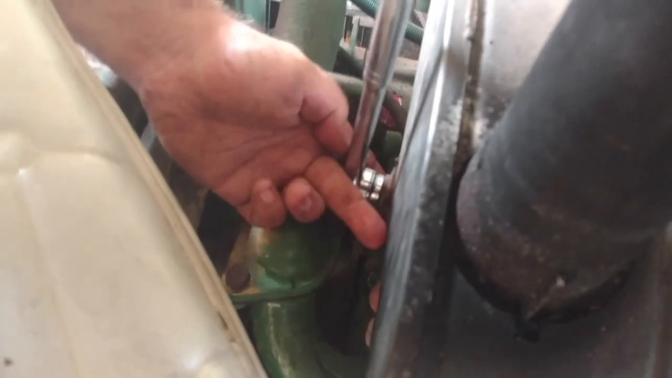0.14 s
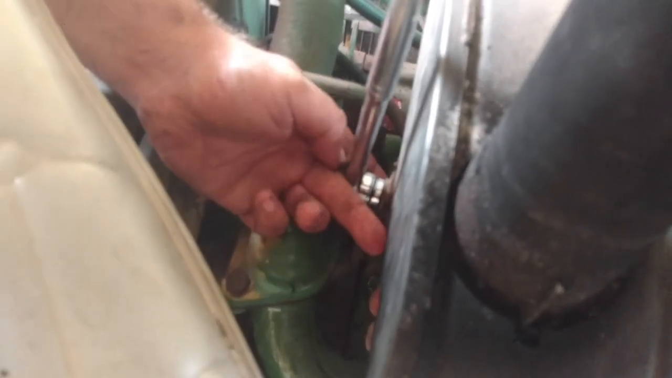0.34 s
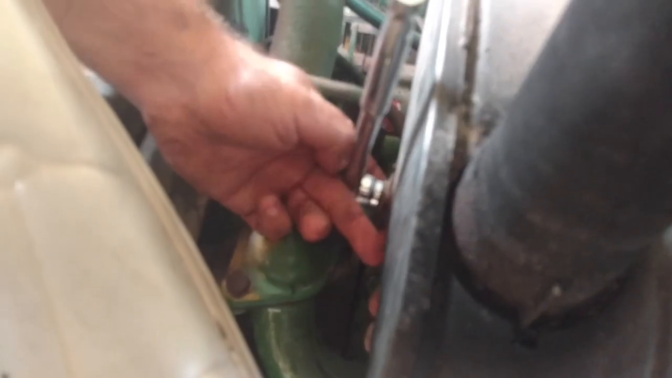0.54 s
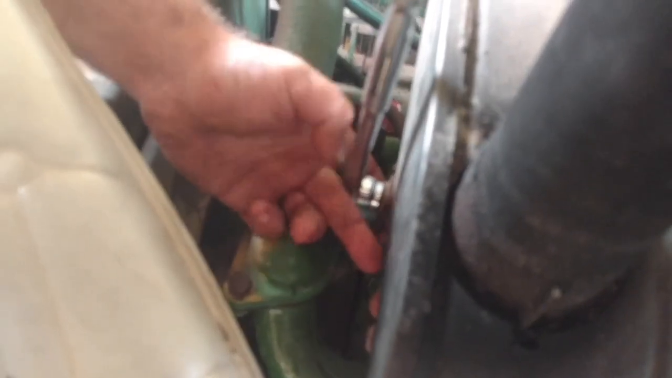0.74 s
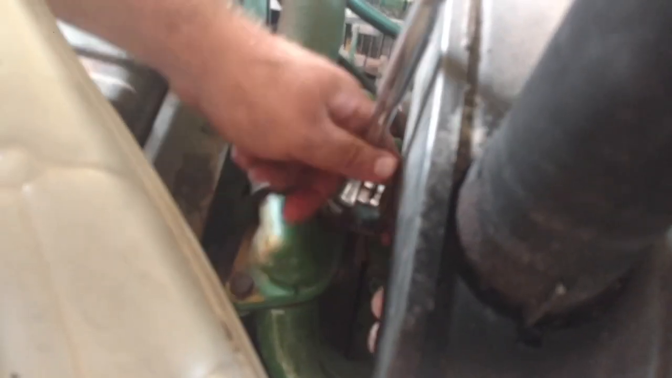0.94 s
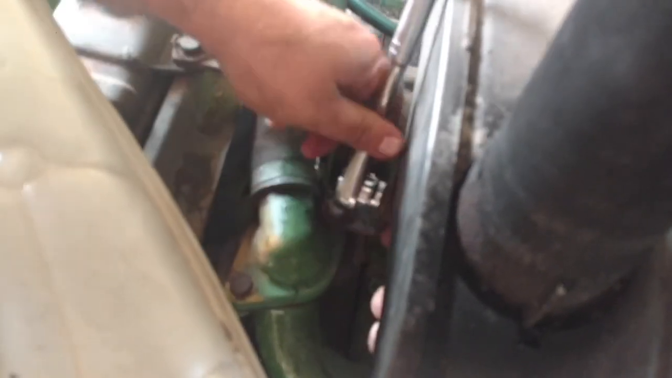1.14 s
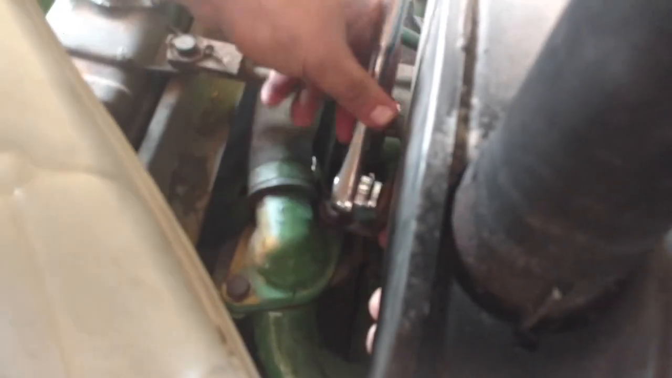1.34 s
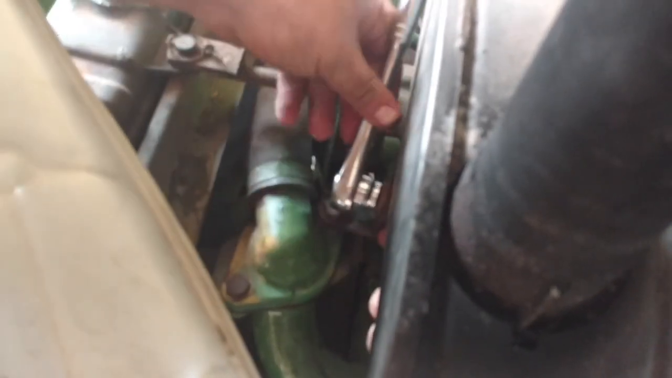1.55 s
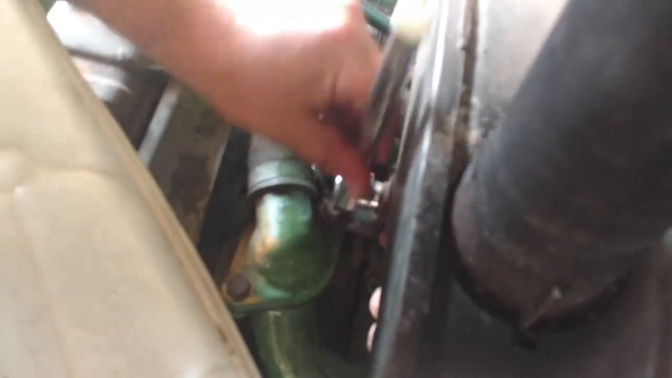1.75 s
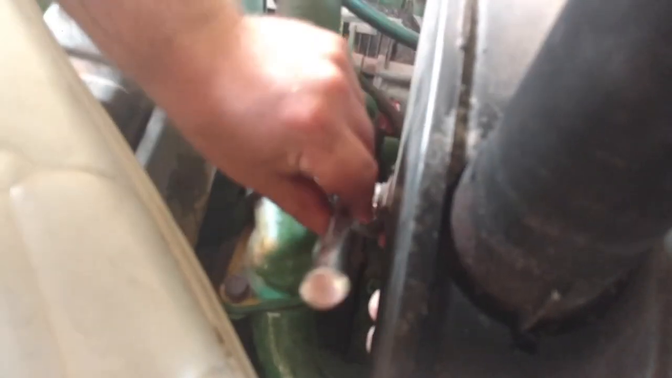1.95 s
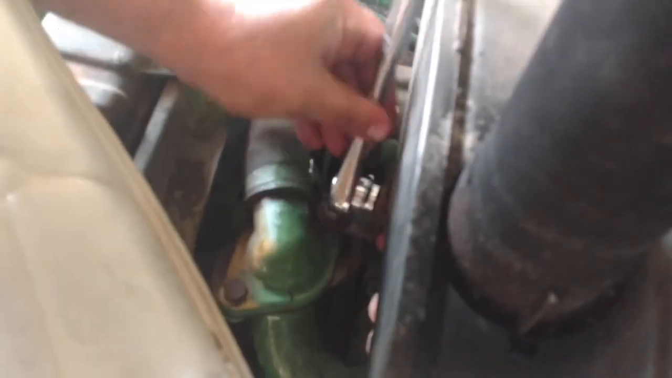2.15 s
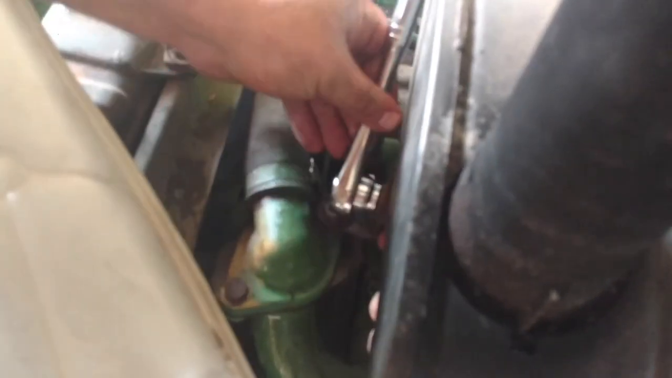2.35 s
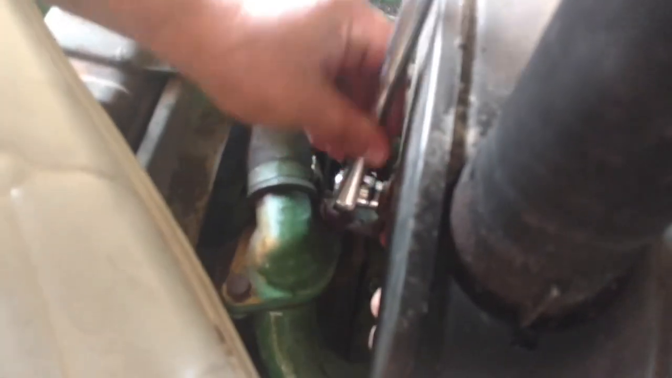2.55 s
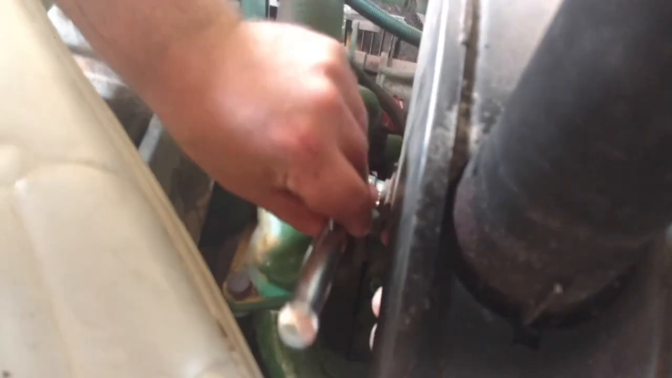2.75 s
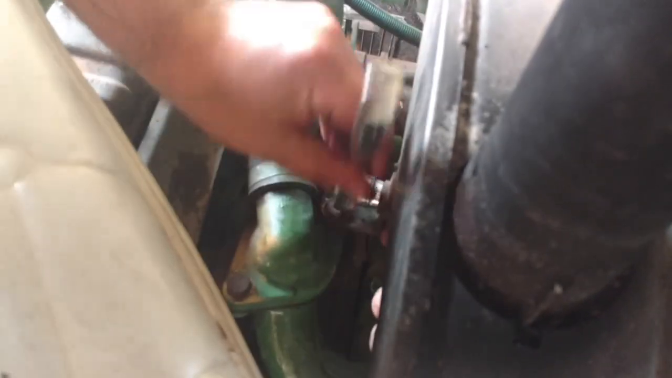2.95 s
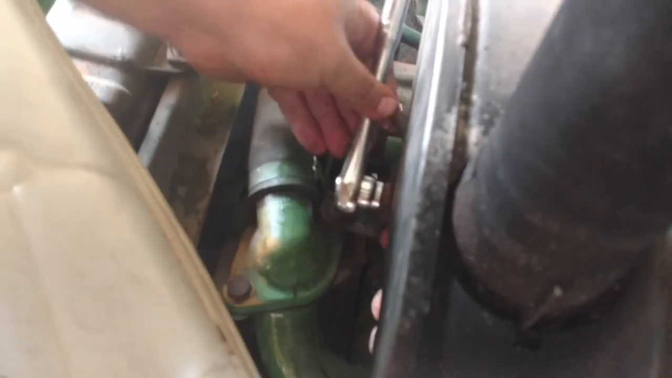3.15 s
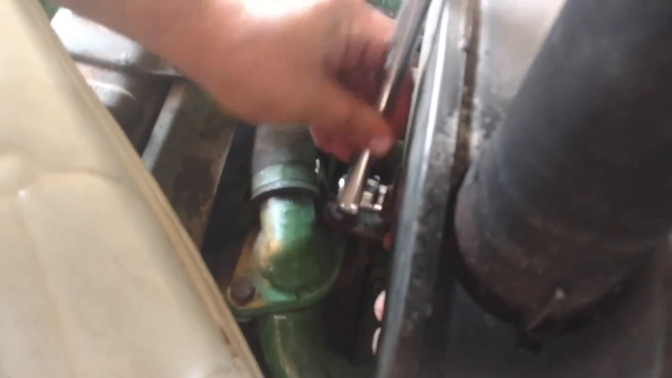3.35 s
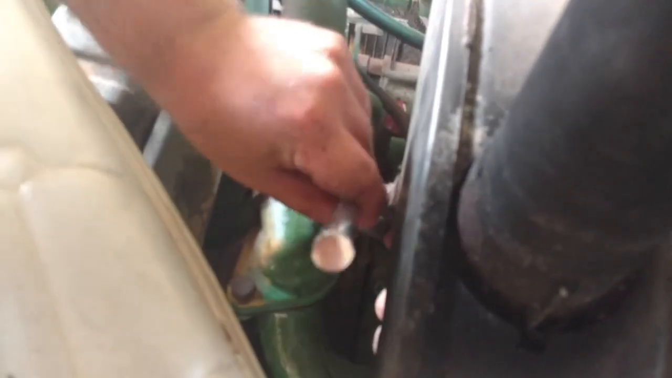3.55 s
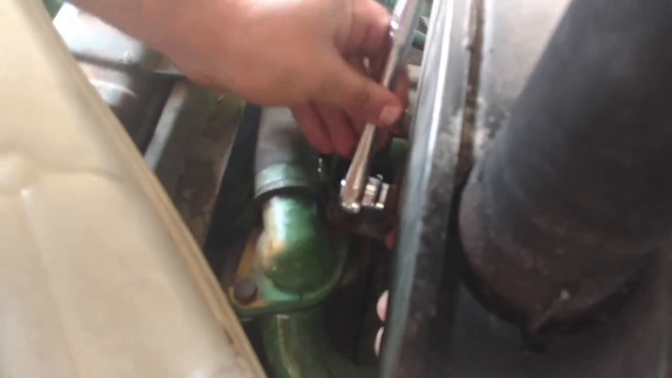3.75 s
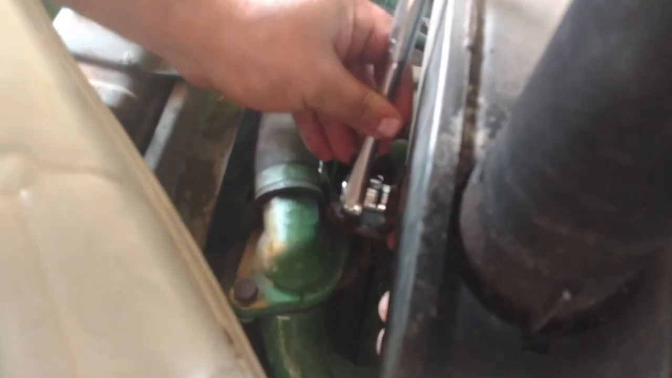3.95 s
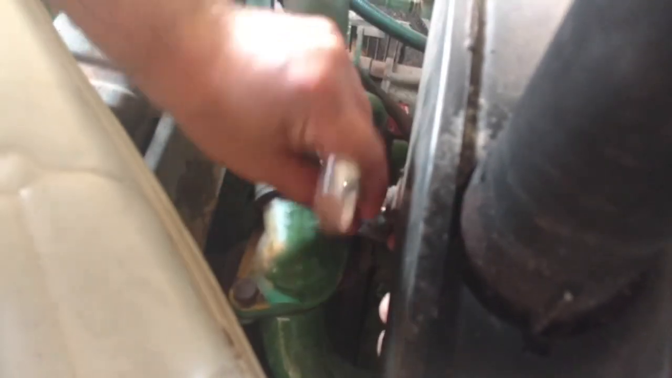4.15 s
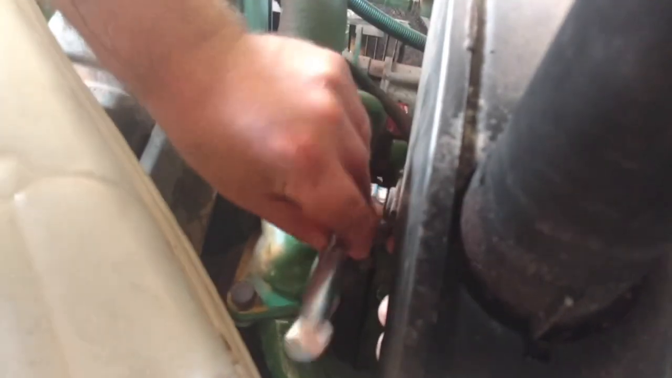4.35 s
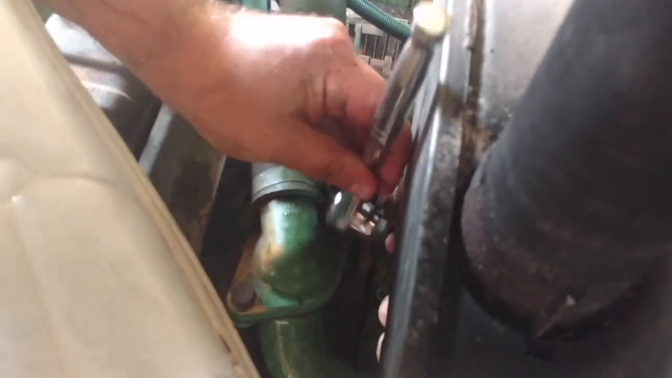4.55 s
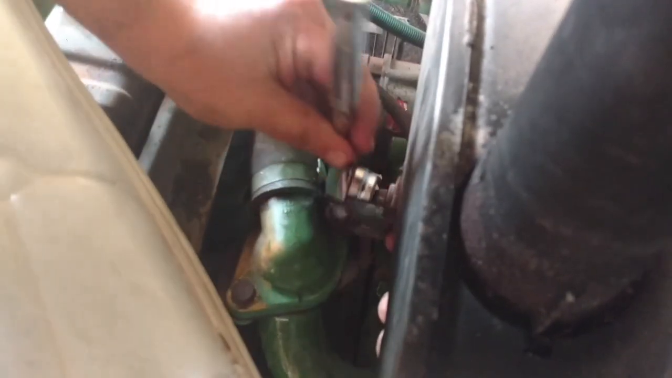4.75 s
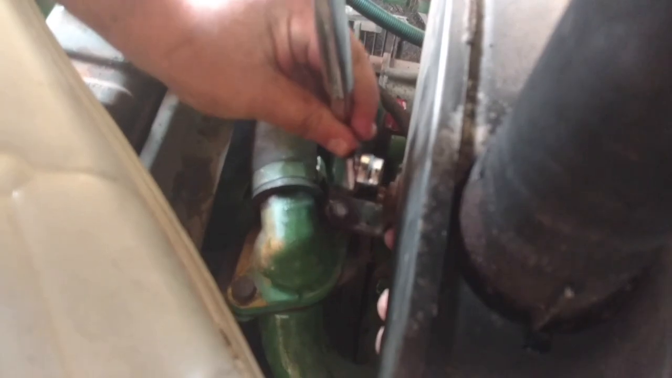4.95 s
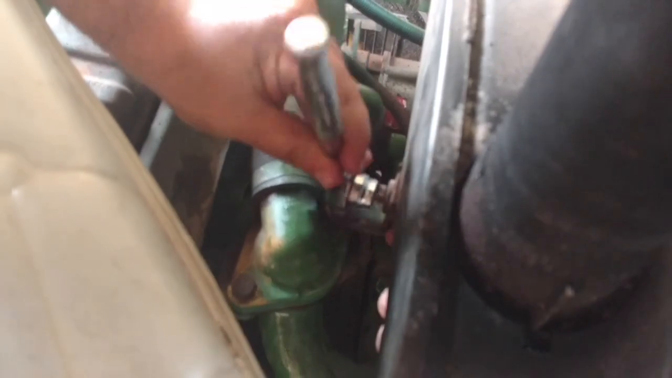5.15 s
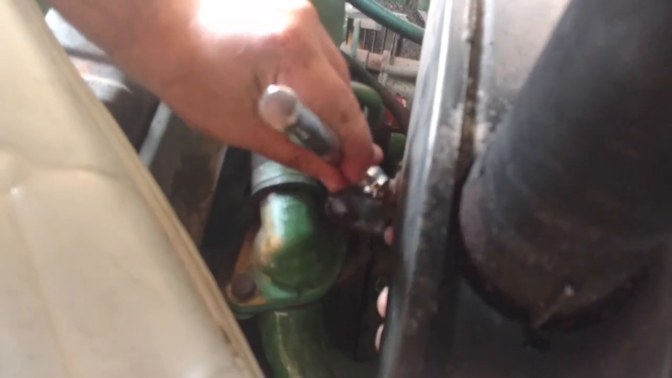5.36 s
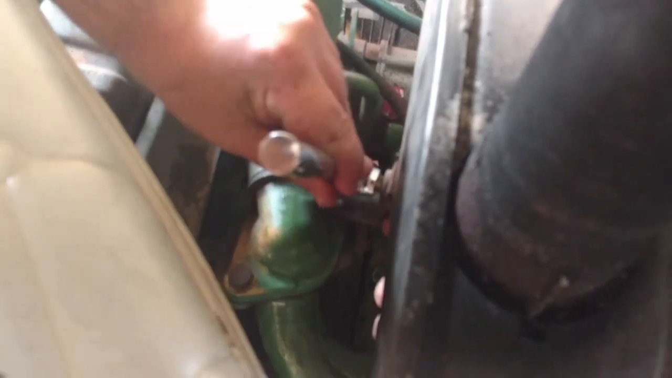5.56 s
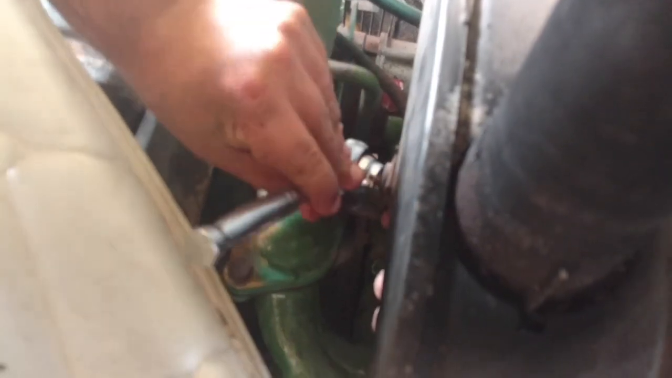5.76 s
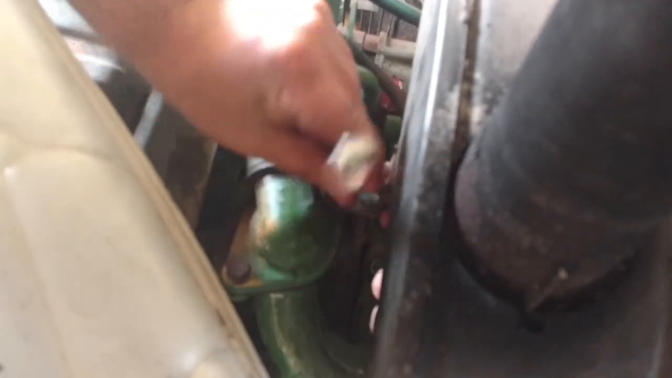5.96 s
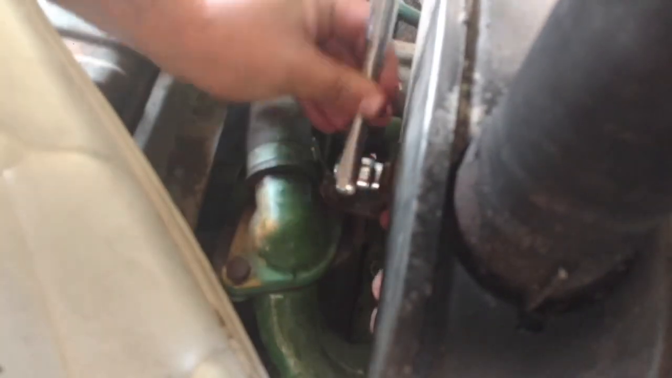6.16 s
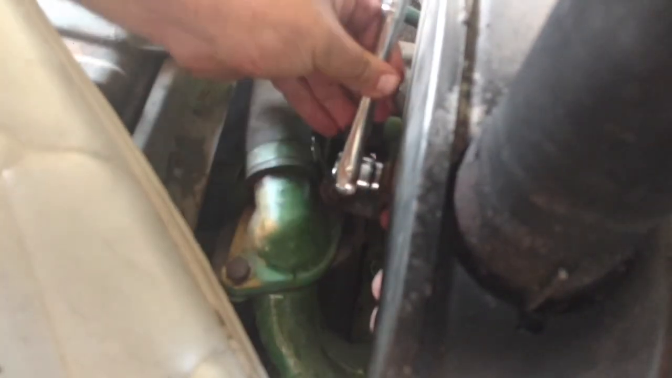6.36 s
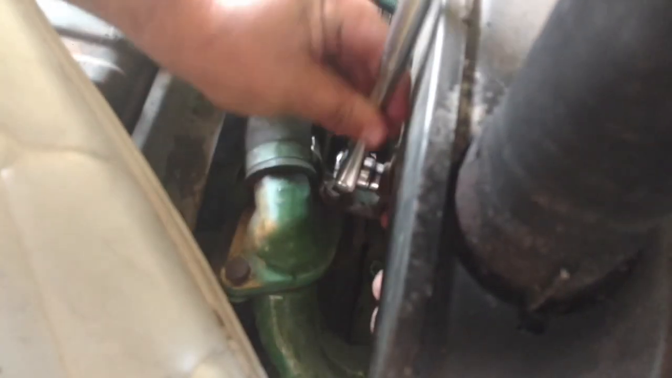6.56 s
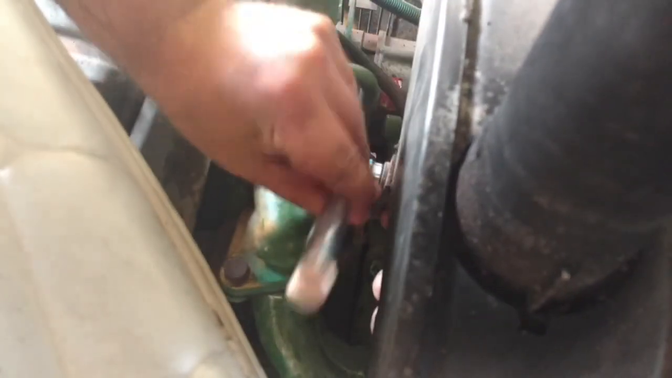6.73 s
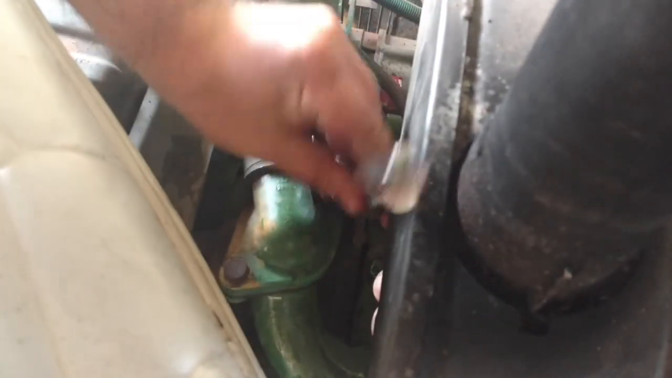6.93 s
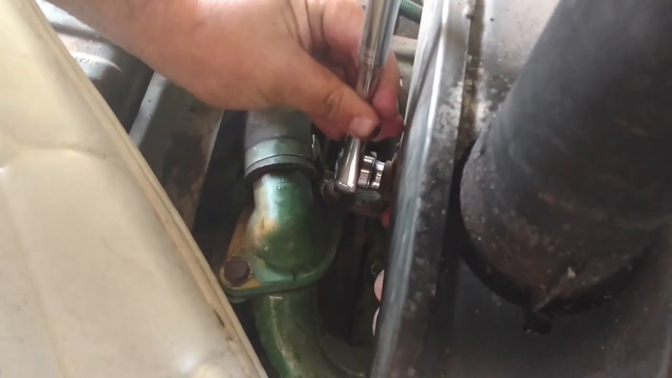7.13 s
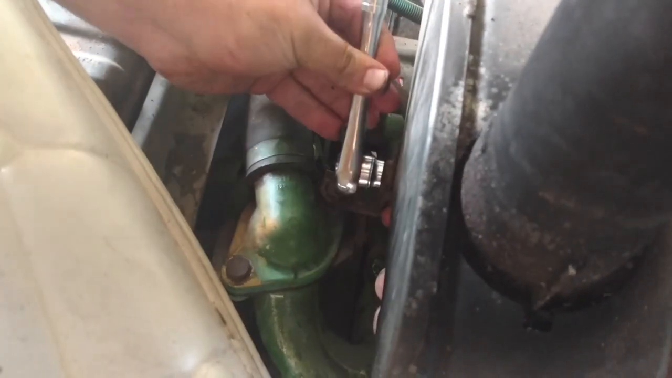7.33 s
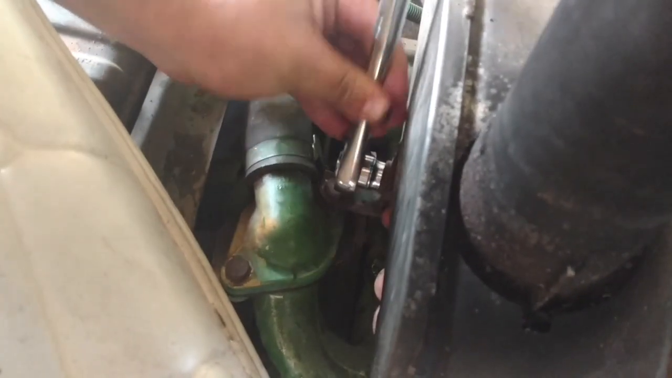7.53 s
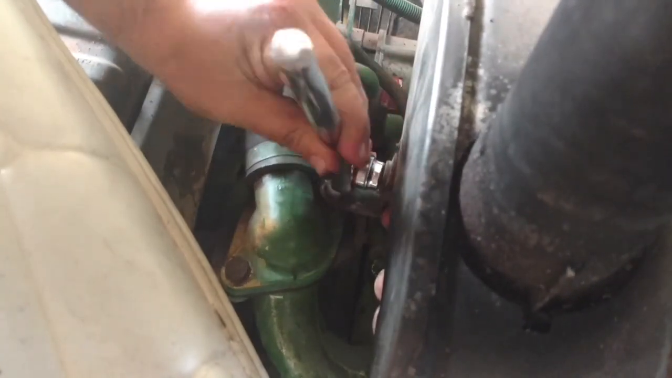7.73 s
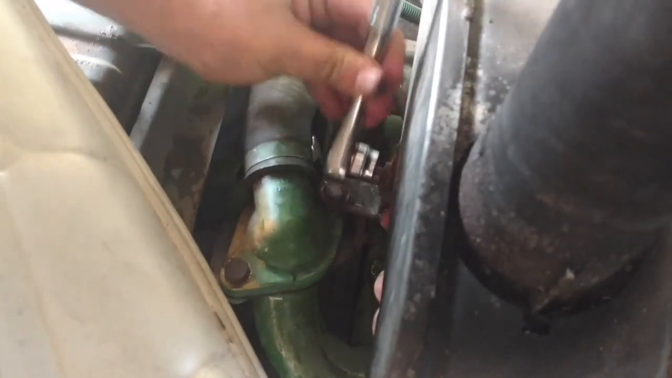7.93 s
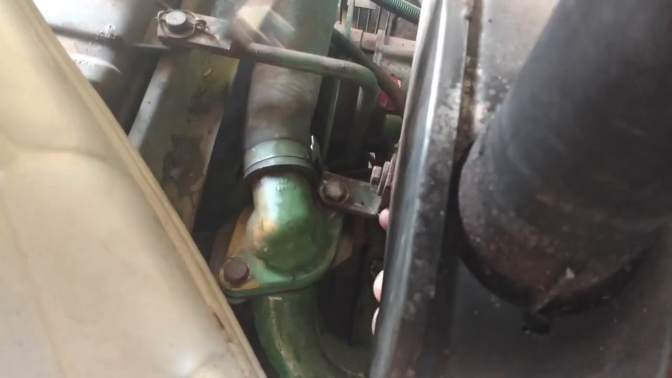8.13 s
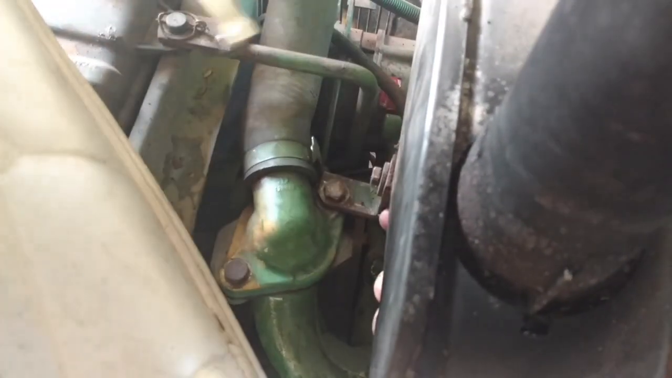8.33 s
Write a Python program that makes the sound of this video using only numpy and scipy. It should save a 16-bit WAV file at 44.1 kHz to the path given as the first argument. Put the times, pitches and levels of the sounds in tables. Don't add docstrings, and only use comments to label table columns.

```python
import sys
import numpy as np
from scipy import signal
from scipy.fft import rfft, irfft, next_fast_len
from scipy.io import wavfile
from scipy.ndimage import uniform_filter1d

SR = 44100
rng = np.random.default_rng(int(sys.argv[2]) if len(sys.argv) > 2 else 0)


def ratio_of_db(decibels):
    return 10 ** (np.asarray(decibels, float) / 20)


def bounce(signal):
    frames = np.transpose(np.atleast_2d(signal))
    limited = np.clip(frames, -1, 1)
    pcm = np.round(limited * 32767).astype(np.int16)
    wavfile.write(sys.argv[1], SR, pcm)


N = 369999


def noise(channels):
    return rng.standard_normal((channels, N))


def band(x, low_hz, high_hz):
    return signal.sosfilt(signal.butter(2, [low_hz, high_hz], "band", fs=SR, output="sos"), x)


def coloured(spectrum, channels):
    hz, db = np.transpose(spectrum)
    size = next_fast_len(N)
    grid_hz = np.maximum(np.arange(size // 2 + 1) * SR / size, 1)
    gain = ratio_of_db(np.interp(np.log(grid_hz), np.log(hz), db))
    return irfft(rfft(noise(channels), size) * gain, size)[:, :N]


def train(times_s, db):
    out = np.full(N, 1e-18)
    np.add.at(out, np.round(np.asarray(times_s) * SR).astype(int), ratio_of_db(db))
    return out


def dying(clicks, t60_s):
    return signal.lfilter([1], [1, -ratio_of_db(-60 / (t60_s * SR))], clicks)


def swelling(clicks, t60_s):
    return dying(dying(clicks, t60_s), t60_s) * np.e * np.log(1000) / (t60_s * SR)


def ring(drive, hz, t60_s):
    r, w = ratio_of_db(-60 / (t60_s * SR)), 2 * np.pi * hz / SR
    return signal.lfilter([0, np.sin(w)], [1, -2 * r * np.cos(w), r * r], drive)


def place(x, lag_samples, pan_db):
    size = next_fast_len(N)
    delay = np.exp(-2j * np.pi * np.arange(size // 2 + 1) / size * lag_samples)
    late = irfft(rfft(x, size) * delay, size)[:N]
    return np.array([late * ratio_of_db(pan_db / 2), x * ratio_of_db(-pan_db / 2)])


# start in seconds, peak in dB, snap in dB rel peak, jolt through the mount in dB.
DROPS = [(0.0, -38.5, -17, -83), (1.4244, -12.5, -46, -37.5), (2.129, -20, -2, -62), (2.139, -16, -8, -47),
         (4.567, -18.5, -5.5, -71), (4.9759, -29.5, -6, -63), (5.3505, -11.5, -7, -66),
         (6.0062, -31.5, 2, -50), (6.009, -10.5, -8, -40.5), (6.0248, -20.5, -23, -65),
         (6.2294, -20.5, -21.5, -65), (6.3753, -13.5, -23, -44), (6.9586, -17, -8, -53),
         (7.8714, -31.5, 0.5, -60)]
# start in seconds, peak in dB, snap in dB rel peak, jolt in dB.
SWING_TEETH = [(2.9958, -16, -6.5, -53), (3.0132, -16, -12, -57), (3.027, -21, -8, -50),
               (3.04, -15.5, -11, -47), (3.051, -18.5, -16, -46), (3.0640, -17.5, -12, -51),
               (3.0763, -17, -18, -44), (3.0884, -15.5, -19, -44), (3.1046, -21.5, -32, -47),
               (3.1074, -22, -21, -57), (3.689, -17, -17, -44), (3.701, -16, -12, -54),
               (3.7123, -16.5, -24, -50), (6.1100, -17, -16, -48), (6.13, -16, -10, -42),
               (6.1464, -14, -14, -44), (6.1582, -18, -21, -54)]
# start in seconds, peak in dB, snap in dB rel peak.
SHIVERS = [(1.0134, -46, 27), (3.853, -42, 4), (4.477, -40, -19), (4.523, -37.5, -9), (4.734, -58.5, 6),
           (5.448, -40.5, -9), (5.929, -50.5, 17.5), (7.5282, -37, -16), (7.542, -45.5, 2.5),
           (2.546, -48, 2)]


def ticks():
    shiver_jolt_db = -65.5
    return np.transpose([*DROPS, *SWING_TEETH] + [(*row, shiver_jolt_db) for row in SHIVERS])


# frequency in Hz, level in dB, t60 in seconds.
HEAD = [(6600, -14, .008), (8479, -14, .008), (9500, -7, .006), (10230, -4, .007), (10800, -3, .005),
        (11220, 0, .01), (11460, -19, .05), (11690, 0, .009), (12200, -20, .04), (12740, -6, .007),
        (13690, -10, .005), (15200, -19, .004)]


def ring_head(s, db_per_mode):
    chatter = dying(train(s, db_per_mode.mean(axis=1) - 12), 0.04)
    grit = noise(channels=3)
    out = 0
    for k, (hz, db, t60_s) in enumerate(HEAD):
        push = dying(train(s, db_per_mode[:, k] + 8), 0.003)
        out = out + ring((push + chatter) * ratio_of_db(db) * grit[k % 3], hz, t60_s)
    return out


def pawl():
    s, db, snap_db, jolt_db = ticks()
    share_db = db[:, None] - 30.5 + 2.2 * rng.standard_normal((len(s), len(HEAD)))
    head = np.array([ring_head(s, share_db + 3), ring_head(s, share_db)])
    edge = band(train(s + 0.0022, db - 2.5) * [[1], [-0.6]], 2500, 16000)
    snap = band(swelling(train(s, db + snap_db + 0.5), 0.0057) * noise(channels=2), 2800, 6900)
    tail = dying(train(s, db - 23), 0.11) * noise(channels=2)
    tail = band(band(tail, 9800, 12600), 9000, 13000)
    bay = band(dying(train(s, db + snap_db - 19), 0.09) * noise(channels=2), 2500, 7500)
    jolt = band(ring(train(s, jolt_db + 18), 260, 0.0066), 70, 900)
    return head + edge + snap + tail + bay + jolt * [[1], [-0.15]]


# start in seconds, peak in dB, crack in dB rel peak, ring centre in Hz.
LOOSE_BLOWS = [(1.0129, -8, -21.5, 1600), (1.0572, -15.5, -20, 1800), (1.503, -27.5, -16.5, 1260),
               (2.071, -19, -20, 1770), (2.299, -28.5, -23, 1170), (3.267, -25.5, -19.5, 1220),
               (3.689, -34.5, -10, 1330), (3.865, -21.5, -20.5, 1270), (3.886, -37, -15, 1210),
               (4.49, -30.5, -22, 573), (4.566, -15.5, -15, 1270), (4.974, -25.5, -10.5, 880),
               (5.349, -16, -12, 977), (5.364, -32.5, -4.5, 990), (5.474, -37, -9, 900),
               (5.666, -29, -14.5, 595), (5.697, -47.5, -3, 800), (4.73, -63, 4, 1100)]
# start in seconds, peak in dB, crack in dB rel peak, centre in Hz.
FIRM_BLOWS = [(1.0178, -16.5, -32, 1390), (1.061, -19, -31, 1630), (1.036, -27, -38, 1300),
              (1.085, -23, -44, 1710), (1.0901, -25.5, -45, 1400), (1.112, -35, -31.5, 1200),
              (1.424, -33, -15, 480), (2.037, -42.5, -11.5, 1080), (2.0907, -22, -39, 1050),
              (2.138, -38.5, -6, 1130), (2.317, -30.5, -25, 1127), (2.714, -51, -33, 1110),
              (3.039, -36.5, -5.5, 786), (3.051, -35, -9, 465), (3.073, -33.5, -23, 456),
              (3.087, -37, -32, 1000), (3.248, -35.5, -14, 715), (3.286, -30.5, -24, 1150),
              (3.461, -41.5, -31.5, 730), (3.71, -32, -9, 1120), (4.424, -40, -25, 780),
              (4.558, -30, -14, 1470), (4.734, -44, -26, 575), (5.19, -31.5, -10, 760),
              (5.292, -39, -33, 800), (5.3008, -31, -23, 900), (5.3207, -25, -19, 1000),
              (5.3223, -26.5, -26, 800), (5.4499, -29, -7, 1100), (5.4545, -22, -17, 895),
              (5.517, -25, -43, 830), (5.906, -30, -10.5, 920), (5.991, -31.5, -9.5, 1090),
              (6.007, -31, -8, 1280), (6.025, -34, -21, 800), (6.11, -33.5, -13.5, 905),
              (6.32, -48.5, -11, 1100), (7.9335, -31, -12, 800), (7.939, -21, -17, 1090),
              (4.441, -35.5, -15.5, 800), (4.46, -40.5, -18, 900), (4.523, -42, -22, 1150),
              (4.571, -26.5, -26, 1300), (4.579, -21.5, -42, 1100), (4.5911, -36, -32, 1150),
              (5.605, -47, -28, 790), (5.7255, -37.5, -20, 800), (5.823, -51, -23, 2000),
              (5.894, -36, -21, 800)]
# start in seconds, peak in dB, ring centre in Hz, slide in dB rel peak.
SLIPS = [(1.53, -43.5, 916, -8), (1.643, -41.5, 577, -10), (2.007, -46.5, 923, 3.5),
         (2.916, -43.5, 1110, 1), (3.62, -47, 1130, 0.5), (4.435, -35.5, 800, 0), (4.508, -31, 934, -2.5),
         (4.699, -43.5, 1420, 8), (5.004, -31.5, 776, -2), (5.099, -35, 597, -3), (5.166, -35.5, 716, 3.5),
         (5.626, -39.5, 740, 5), (5.643, -27, 805, -3), (5.889, -35, 734, 13.5), (6.149, -34.5, 1190, -8),
         (6.89, -57.5, 764, 14), (7.259, -48.5, 468, -21), (7.456, -43.5, 533, -1.5), (7.818, -41, 436, 7),
         (7.874, -33, 1590, 0.5)]
# start in seconds, peak in dB, crack in dB rel peak.
SOCKET_TAPS = [(.902, -45.5, 3), (2.228, -53, -16), (2.613, -42, -22.5), (2.86, -52, -32.5),
               (2.995, -37.5, -7), (3.231, -45.5, -15), (3.674, -43, -34), (4.073, -37, -14.5),
               (4.13, -38, -19), (4.391, -46.5, -20), (4.407, -42, -9.5), (5.709, -35, -34.5),
               (5.749, -55, -23), (5.844, -47.5, -31), (6.132, -37.5, -5), (6.445, -51.5, -9.5),
               (6.485, -47.5, -21), (6.591, -47, -18.5), (7.025, -48, -18), (7.103, -47.5, -17),
               (7.44, -56, -13), (6.935, -44.5, -17.5), (7.48, -49.5, -9), (7.527, -39.5, -8.5),
               (7.635, -49, -24)]
HANDLE_TAPS = [(.987, -51, -4), (2.698, -51, -14), (2.884, -39, -20.5), (3.197, -41.5, -15.5),
               (3.853, -39, -15), (4.05, -46.5, -10.5), (4.477, -38, -9.5), (5.232, -41, -30),
               (6.231, -42.5, -5), (6.96, -33.5, -9)]
CASING_TAPS = [(.447, -46.5, -21), (2.539, -36.5, -12), (2.952, -50, -5.5), (3.547, -40, -22.5),
               (6.375, -44, -0.5), (7.513, -44, -17)]
# start in seconds, peak in dB.
GRIT = [(1.6272, -51.5), (2.103, -51), (3.6724, -54), (4.523, -40.5), (4.7298, -53.5), (5.5298, -46),
        (5.58, -66), (5.722, -59), (5.748, -52), (5.7981, -63), (5.8211, -52), (5.8872, -42), (5.9, -33),
        (5.9297, -39), (5.946, -46), (5.9782, -52), (7.4669, -57.5), (8.153, -50)]


def knocks():
    firm_rattle_db, tap_rattle_db = -33.5, -10
    rows = [(*row, -7 - 0.18 * (row[1] + 21)) for row in LOOSE_BLOWS]
    rows += [(*row, firm_rattle_db) for row in FIRM_BLOWS]
    rows += [(s, db, -14.5 - 0.21 * (db + 44.5), hz, slide_db) for s, db, hz, slide_db in SLIPS]
    for taps, centre_hz in ((SOCKET_TAPS, 770), (HANDLE_TAPS, 1130), (CASING_TAPS, 460)):
        rows += [(*row, centre_hz, tap_rattle_db) for row in taps]
    rows += [(s, db - 14, 6.5, 1500, firm_rattle_db) for s, db in GRIT]
    return np.transpose(rows)


def ring_iron(modes, s, db_per_mode, extra):
    at, out = np.round(s * SR).astype(int), 0
    throw = rng.choice([-1, 1], db_per_mode.shape) * ratio_of_db(db_per_mode)
    for k, (hz, db, t60_s) in enumerate(modes):
        drive = (-1) ** k * extra + 1e-18
        np.add.at(drive, at, throw[:, k])
        out = out + ring(ratio_of_db(db) * drive, hz, t60_s)
    return out


# centre in Hz, level in dB.
THUDS = [(520, -5), (800, -6.5), (1200, -11), (1750, -8), (2250, -8.5)]


def casting(s, db, centre_hz):
    out = 0
    for hz, thud_db in THUDS:
        level_db = db + thud_db - 7 * np.log2(hz / centre_hz) ** 2
        hits = train(s, level_db)
        shape = ratio_of_db(-6.5) * (swelling(hits, 0.014) + dying(hits, 0.091))
        strike = ring(train(s + 0.001, level_db + 2 + 0.9 * db), hz, 0.037)
        thud = shape * noise(channels=3) + strike * [[1], [0], [0]]
        shared, *own = band(band(thud, hz / 1.25, hz * 1.22), hz / 1.14, hz * 2)
        out = out + ratio_of_db(2) * place(shared, 5.1, -0.3) + ratio_of_db(6) * np.array(own)
    return out


# start in seconds, level in dB, t60 of the shaking in seconds.
BOOMS = [(1.013, -43, 0.36), (1.085, -47, 0.11), (1.62, -59, 0.31), (2.08, -60, .1), (3.27, -53, 0.29),
         (3.865, -51.5, 0.32), (4.1, -62.5, .4), (4.448, -50, 0.34), (4.566, -49, 0.23), (5.0, -53.5, 0.69),
         (5.161, -50.5, 0.35), (5.33, -43.5, 0.45), (5.64, -48.5, 0.69), (5.9, -41.5, 0.37),
         (6.45, -63.5, .3), (7.49, -56.5, 0.21), (7.835, -51, 0.32)]
# frequency in Hz, level in dB, t60 in seconds.
SHEET = [(253.6, -0.5, 0.27), (170, -4, .25), (185, -5, .2), (346.3, -6.5, .15)]


def mudguard():
    shake, since_s = np.full(N, 1e-18), np.arange(SR // 2) / SR
    for s, db, t60_s in BOOMS:
        shake[int(s * SR):][:len(since_s)] += ratio_of_db(db - 26 - 60 * since_s / t60_s)
    shake *= noise(channels=1)[0]
    return place(sum(ratio_of_db(db) * ring(shake, hz, t60_s) for hz, db, t60_s in SHEET), 1.8, -1)


# start in seconds, level in dB, pitch in Hz, t60 in seconds.
CLANKS = [(1.0136, -5.5, 1880, 0.01), (1.0182, -19, 901, 0.03), (1.0589, -13.5, 1810, 0.01),
          (1.0623, -18, 1500, 0.014), (1.0864, -21, 1700, 0.012), (1.09, -28, 1400, 0.012),
          (2.0727, -30, 1750, 0.019), (3.267, -33, 1196, 0.018), (3.8661, -32, 1006, .02),
          (4.5653, -29.5, 1500, 0.078), (4.6994, -48.5, 1450, 0.056), (5.3491, -20, 1010, 0.0095),
          (1.5034, -24.5, 1320, 0.011), (1.5293, -30.5, 1220, 0.0079), (2.3012, -26.5, 1220, .012),
          (5.5176, -29.5, 890, 0.018), (5.908, -23.5, 990, 0.0094), (5.3222, -30, 786, 0.024),
          (5.4548, -24, 790, .014), (5.668, -28, 1100, 0.0072), (7.939, -33, 900, 0.0081),
          (6.009, -32, 1300, 0.0054)]


def clanks():
    split_hz = 1350
    out, since_s = np.zeros((2, N)), np.arange(SR // 8) / SR
    for s, db, hz, t60_s in CLANKS:
        sine = ratio_of_db(db - 60 * since_s / t60_s) * np.sin(2 * np.pi * hz * since_s)
        out[int(hz > split_hz), int(s * SR):][:len(since_s)] += sine
    low, high = out
    return place(low, 8, 0.2) + place(high, -1, -2)


IRON_HZ = [426, 490, 583, 674, 725, 786, 851, 915, 1008, 1115, 1161, 1260, 1330, 1436, 1600, 1656, 1701,
           1746, 1927, 2094, 2240]
# level in dB, t60 in seconds.
IRON = [(-7, 0.074), (-14, 0.26), (-1, 0.039), (-16.5, 0.16), (4.5, 0.016), (-4.5, 0.072), (-11.5, 0.054),
        (-2.5, 0.023), (-10.5, 0.078), (-13.5, 0.13), (-6.5, 0.089), (-6.5, 0.019), (-9.5, 0.061),
        (-6, 0.021), (-16.5, 0.0099), (-6.5, 0.034), (-8, 0.021), (-8.5, 0.0081), (-11, 0.023),
        (-4.5, 0.0035), (-18.5, 0.017)]


def iron(rub_db):
    s, db, crack_db, centre_hz, rattle_db = knocks()
    modes = np.column_stack([IRON_HZ, IRON])
    octaves = np.log2(modes[:, 0] / centre_hz[:, None])
    share_db = db[:, None] - 12.5 - 9.6 * octaves ** 2 + 2.1 * rng.standard_normal(octaves.shape)

    grains_per_s = 900
    sizes = ratio_of_db(4 * np.minimum(rng.exponential(1, N), 3))
    grains = (rng.random(N) < grains_per_s / SR) * sizes * rng.choice([-1, 1], N)
    rattle, rub = dying(train(s, db + rattle_db - 30), 0.2), ratio_of_db(rub_db - 32)
    loose = rattle + rub

    drive = grains * rub + ratio_of_db(1.5) * band(grains * rattle, 260, 3600)
    body = ring_iron(modes, s, share_db, drive)
    aside = ring_iron(modes[1::2], s, share_db[:, 1::2] - 9, ratio_of_db(-5.5) * np.roll(grains, 99) * loose)
    crack = band(swelling(train(s, db + crack_db + 9.5), 0.013) * noise(channels=2), 1500, 4000)
    clatter = band(dying(train(s, db + crack_db - 7.5), 0.19) * noise(channels=2), 1298.3, 4700)
    scrape = ratio_of_db(9) * band(np.array([grains, np.roll(grains, 7)]) * loose, 2700, 3200)
    metal = place(body, 3, -0.3) + aside * [[1], [-1]] + clanks() + casting(s, db, centre_hz)
    return metal + mudguard() + crack + clatter + scrape


def shadowed(x):
    return x + 0.39 * band(x, 1400, 2500) * [[-1], [0.6]]


# start in seconds, peak in dB, pitch in Hz.
THUMPS = [
    (2.756, -62, 140),
    (3.545, -53.5, 124),
    (6.756, -71.5, 119.5),
]


def thumps():
    s, db, _ = np.transpose(THUMPS)
    bump = sum(ring(train([at_s], level_db + 18), hz, 0.082) for at_s, level_db, hz in THUMPS)
    scuff = band(dying(train(s, db + 32.5), 0.12) * noise(channels=2), 78, 293)
    return place(bump, 1.8, -0.61) + scuff


# time in seconds, second partial in Hz, level in dB.
YAPS = [
    [(7.836, 1374, -61.5), (7.85, 1528, -54), (7.864, 1643, -49), (7.885, 1660, -50.5), (7.905, 1608, -54),
     (7.92, 1470, -49), (7.935, 1360, -63)],
    [(8.172, 1367, -50), (8.186, 1580, -49.5), (8.204, 1655, -49), (8.232, 1603, -47), (8.262, 1330, -47),
     (8.285, 1380, -55), (8.31, 1310, -55.5)],
]
# multiple of the fundamental, level in dB.
YAP_PARTIALS = [(1, -16), (2, 0), (3, -19), (4, -8), (5, -27), (6, -11), (7, -20)]


def dog():
    t, out = np.arange(N) / SR, np.zeros(N)
    dull_db_per_hz = 0.07 / 0.42
    hoarse = 1 + 2 * band(noise(channels=1)[0], 30, 300)
    for yap in YAPS:
        s, hz, db = np.transpose(yap)
        pitch_hz, level_db = np.interp(t, s, hz), np.interp(t, s, db)
        phase = np.pi * np.cumsum(pitch_hz) / SR
        gate = np.clip(np.minimum(t - s[0], s[-1] - t) / 0.0026, 0, 1)
        effort_db = level_db - db.max() - dull_db_per_hz * (max(hz) - pitch_hz)
        for k, partial_db in YAP_PARTIALS:
            height_db = level_db + 0.9 + partial_db + 0.13 * abs(k - 2) * effort_db
            out += gate * ratio_of_db(height_db) * np.sin(k * phase)
    out *= hoarse
    breath = ratio_of_db(-14) * band(np.abs(out) * noise(channels=1)[0], 900, 6000)
    echoes = sum(ratio_of_db(-15 - 150 * d) * np.roll(out, int(d * SR)) for d in (0.013, 0.029, 0.047, 0.071))
    yard_db, yard_t60_s = -34, 0.53
    walls = rng.standard_normal((2, SR)) * ratio_of_db(yard_db - 60 * np.arange(SR) / SR / yard_t60_s)
    linger = signal.fftconvolve(walls, out[None], axes=1)[:, :N]
    return place(out + breath + echoes, 0.81, 0.35) + linger


# start in seconds, level in dB.
CHIRPS = [
    (8.06, -72),
    (8.35, -69),
]


def bird():
    t, out = np.arange(N) / SR, 0
    length_s, low_hz, top_hz, turn = 0.085, 2900, 4350, 0.62
    for start_s, db in CHIRPS:
        u = np.clip((t - start_s) / length_s, 0, 1)
        hz = top_hz - (top_hz - low_hz) * (1 - u / turn) ** 2
        out = out + ratio_of_db(db) * np.sin(np.pi * u) * np.sin(2 * np.pi * np.cumsum(hz) / SR)
    return place(out, 1.5, 0.43)


# time in seconds, background in dB after the drop.
GAIN_DROPS = [(0, -63.5), (.1, -68), (1.425, -71.5), (2.14, -70.5), (3.05, -71), (3.7, -70.5), (6.01, -69),
              (6.38, -72), (6.96, -68.5)]


def gain_control():
    creep_db_per_s, drop_s = 7.5, 0.061
    t, (s, db) = np.arange(N) / SR, np.transpose(sorted(GAIN_DROPS))
    last = np.maximum(np.searchsorted(s, t) - 1, 0)
    return uniform_filter1d(db[last] + creep_db_per_s * (t - s[last]), int(drop_s * SR))


# frequency in Hz, density in dB per Hz.
AIR = [(30, -16.5), (70, 0), (96, 18), (130, 9.5), (200, 11), (500, 5.5), (800, -2.5), (1200, 0.5),
       (1700, -19.5), (3000, -18)]
# frequency in Hz, density in dB per Hz.
HISS = [(40, -21), (100, -3), (1000, -15.5), (2500, -14.5), (6000, -24), (7700, -12.5), (8500, -23),
        (10100, 2.5), (10600, -7), (11300, -52), (14000, -26), (16000, -33.5)]
# frequency in Hz, level in dB rel rumble, share of the fade.
HUMS = [(96, -8, 0.92), (125.4, -13.5, 0.05), (466, -22.5, 1.0), (255, -22, 0.11)]
# time in seconds, level in dB.
HUM_FADE = [(0, 0.5), (1.4, 0.5), (1.6, -16.5), (8.39, -25)]


def background(gain_db, rumble_db):
    t = np.arange(N) / SR
    wobble = 1 + 3.5 * band(noise(channels=len(HUMS)), 1.5, 12)
    fade_db = np.interp(t, *np.transpose(HUM_FADE))
    hums = 0
    for (hz, db, share), sway in zip(HUMS, wobble):
        hums = hums + ratio_of_db(db + share * fade_db + 28) * sway * np.sin(2 * np.pi * hz * t)
    low = ratio_of_db(34.5) * band(band(noise(channels=1)[0], 93, 170), 51, 220)
    rumble = ratio_of_db(rumble_db) * (hums + low)
    air = ratio_of_db(gain_db + 4) * coloured(AIR, channels=1)[0]
    hiss = ratio_of_db(gain_db + 15) * coloured(HISS, channels=2)
    return place(air + rumble, 8.1, -1.3) + hiss


# time in seconds, level in dB.
HAND = [(0.0, -52), (0.601, -57), (1.101, -42.5), (1.298, -58), (1.55, -74), (2.102, -72), (2.48, -55.5),
        (3.1, -76.5), (4.5, -60.5), (4.74, -81), (5.159, -52), (5.5, -41), (5.7, -58.5), (5.93, -50),
        (6.14, -74.5), (6.9, -68.5), (7.5, -74), (8.39, -63.5)]


def scene():
    rub_db, gain_db = np.interp(np.arange(N) / SR, *np.transpose(HAND)), gain_control()
    rumble_db = gain_db - 13.5 + 0.047 * (rub_db - rub_db.mean())
    sides = np.array([[0.5], [-0.5]])
    tool = pawl() * ratio_of_db(2.8 * sides) + shadowed(iron(rub_db)) * ratio_of_db(-0.5 * sides)
    return tool + thumps() + dog() + bird() + background(gain_db, rumble_db)


def top_cut(x):
    return signal.sosfilt(signal.butter(12, 16630, fs=SR, output="sos"), x)


def record(dry):
    lag_samples, blur = 17, 0.24
    dry = signal.sosfilt(signal.butter(1, 110, "high", fs=SR, output="sos"), dry)
    crossed = np.pad(dry[::-1], ((0, 0), (lag_samples, 0)))[:, :N]
    crossed = signal.lfilter([1 - blur, blur], [1], crossed)
    wide = ratio_of_db(-0.3) * (dry - 0.77 * crossed)
    cut = signal.sosfilt(signal.cheby2(12, 70, 16700, fs=SR, output="sos"), wide)
    return top_cut(np.clip(cut, -1, 1))


dry = scene()
out = record(dry)
bounce(out)
```